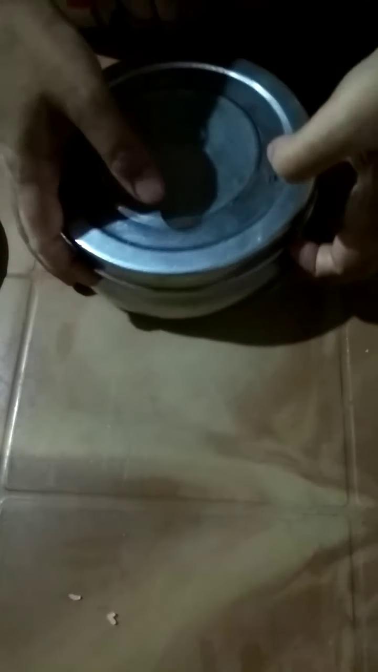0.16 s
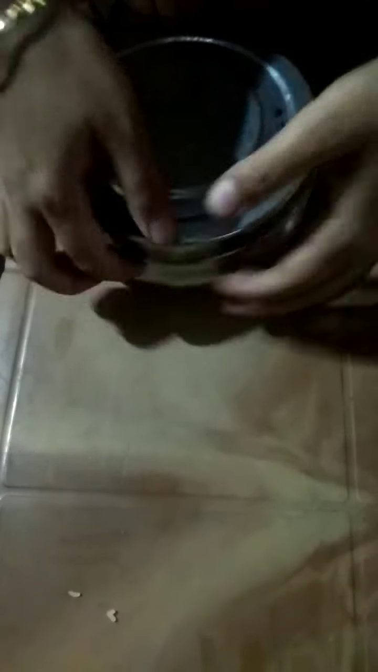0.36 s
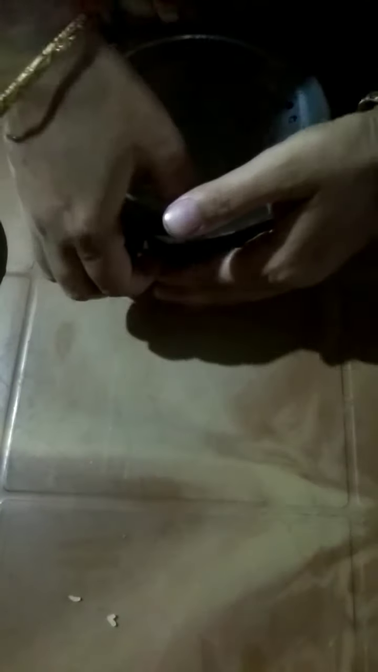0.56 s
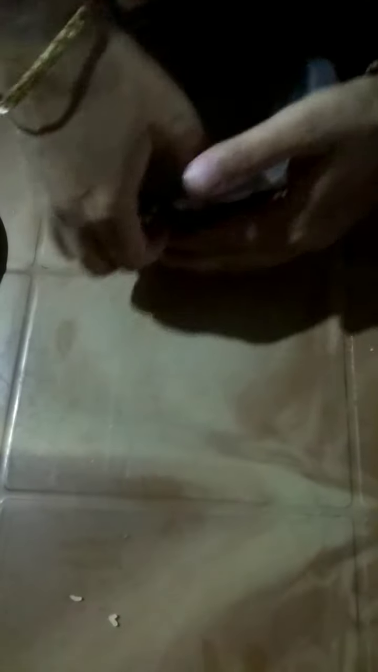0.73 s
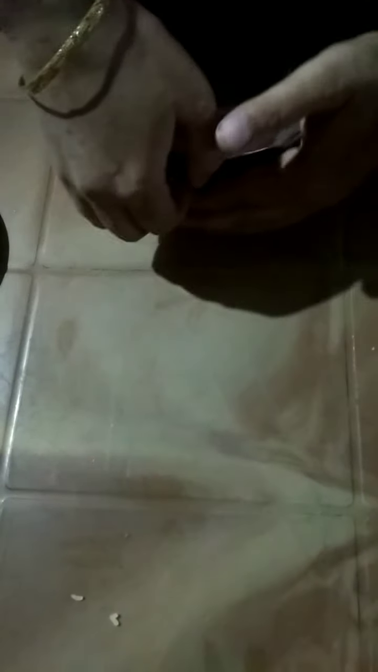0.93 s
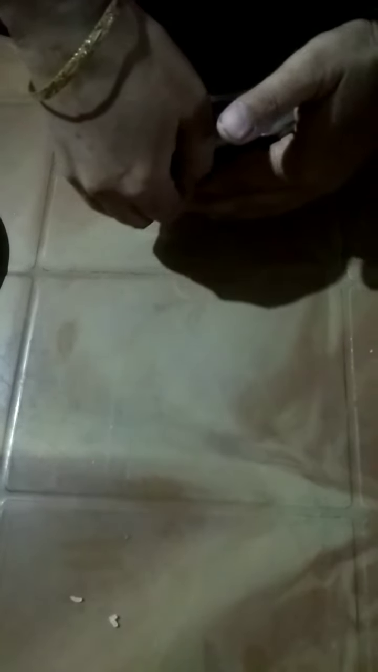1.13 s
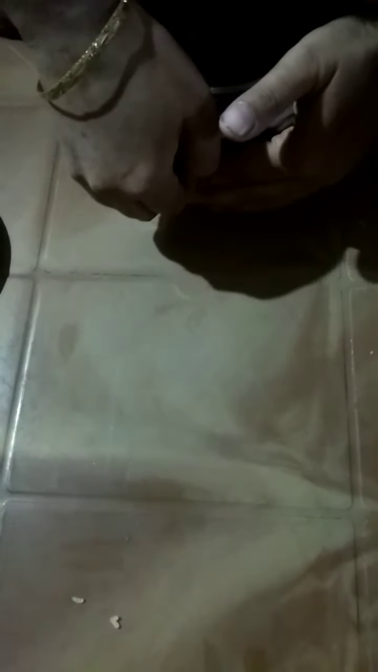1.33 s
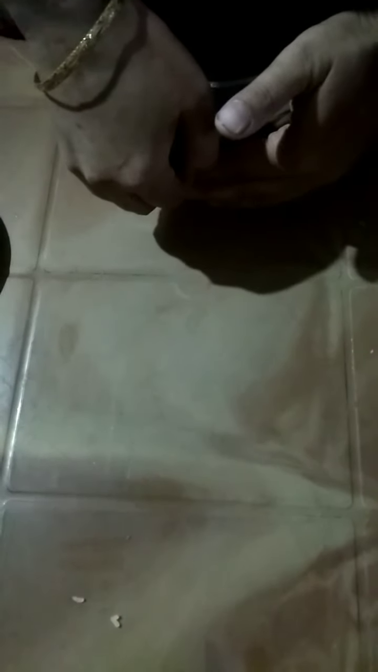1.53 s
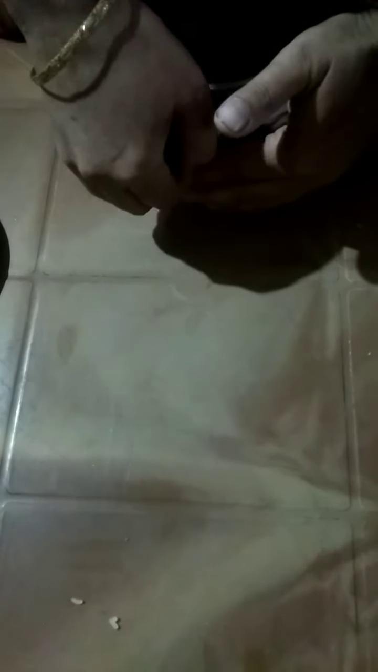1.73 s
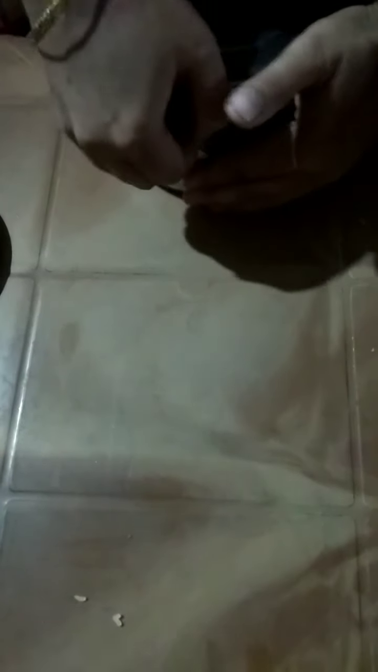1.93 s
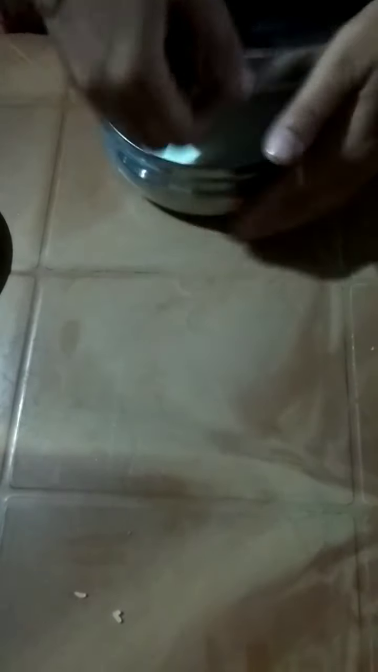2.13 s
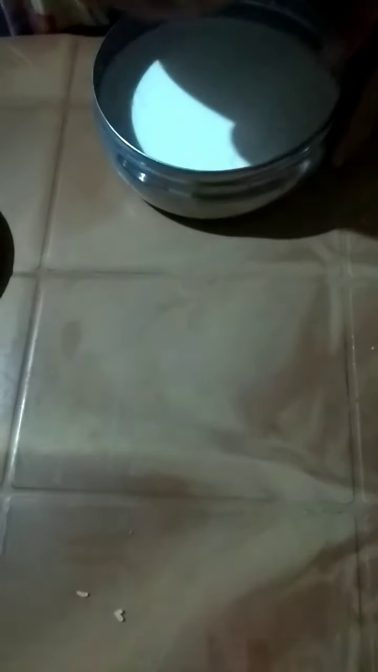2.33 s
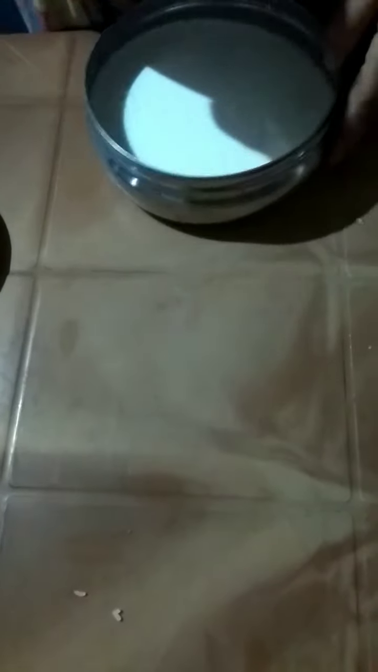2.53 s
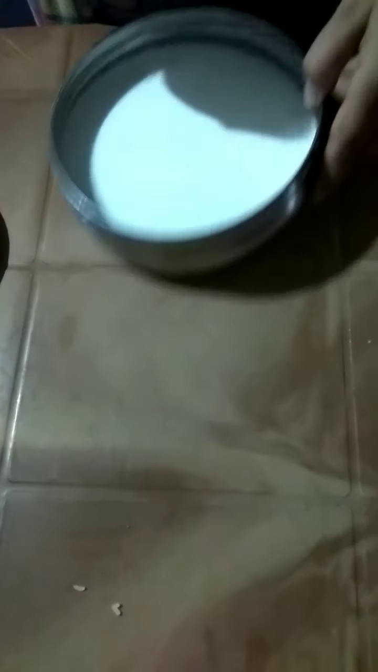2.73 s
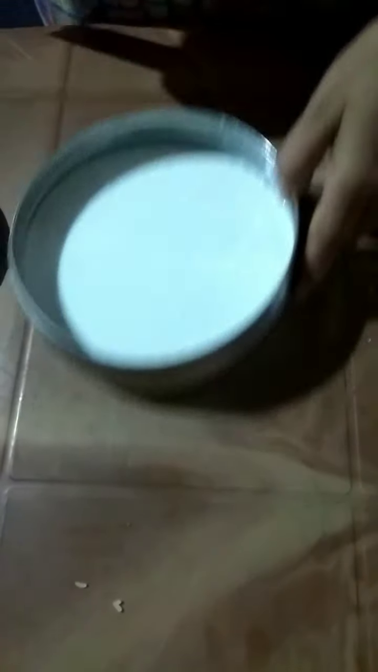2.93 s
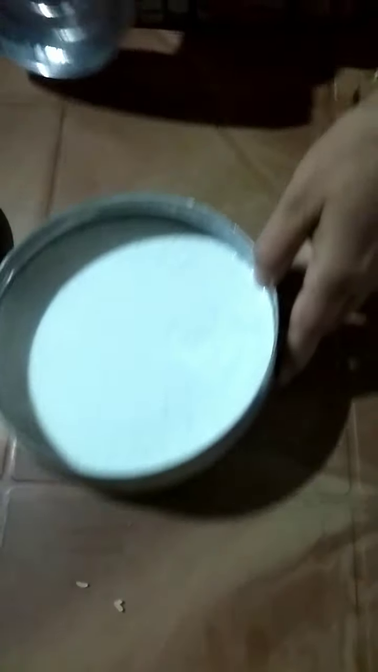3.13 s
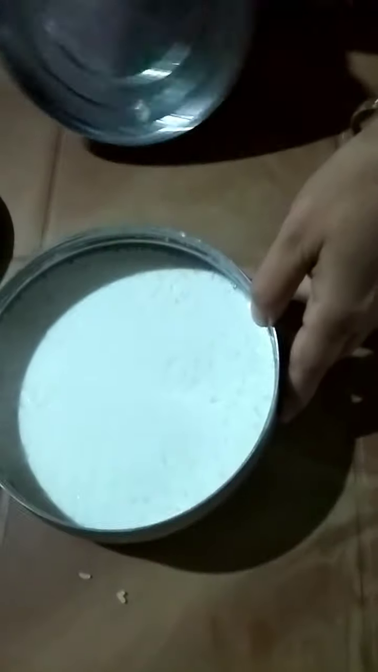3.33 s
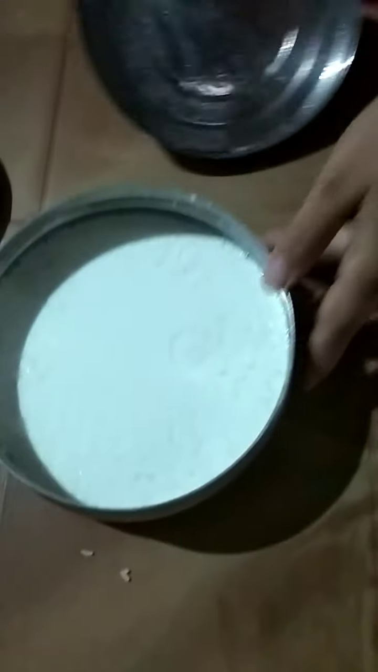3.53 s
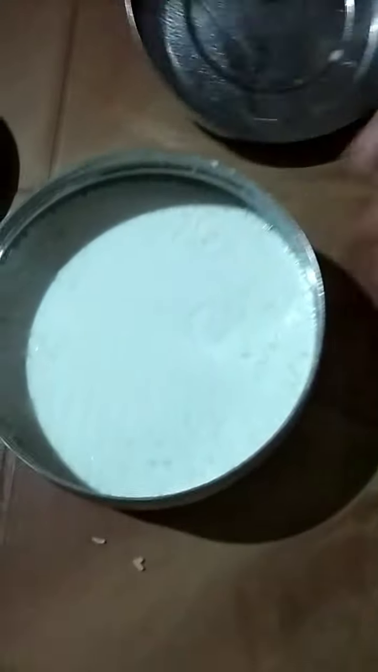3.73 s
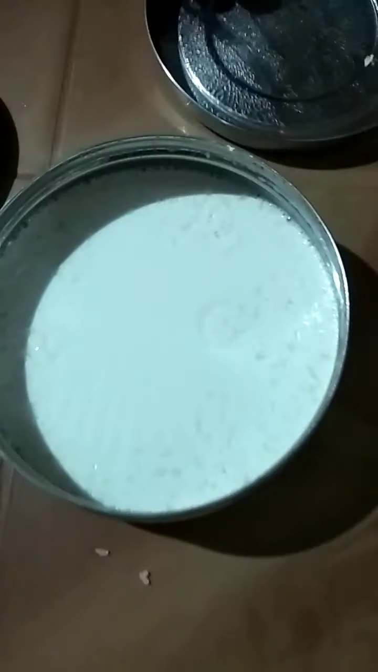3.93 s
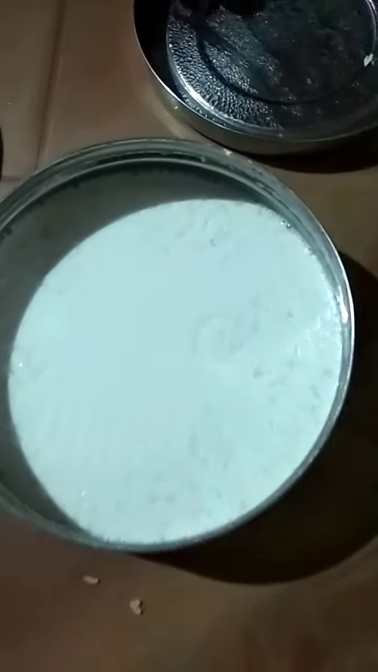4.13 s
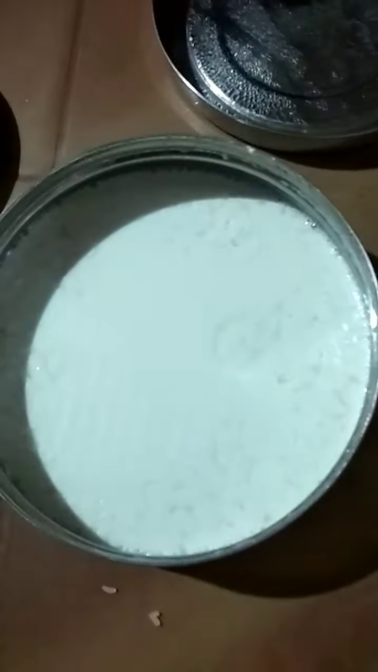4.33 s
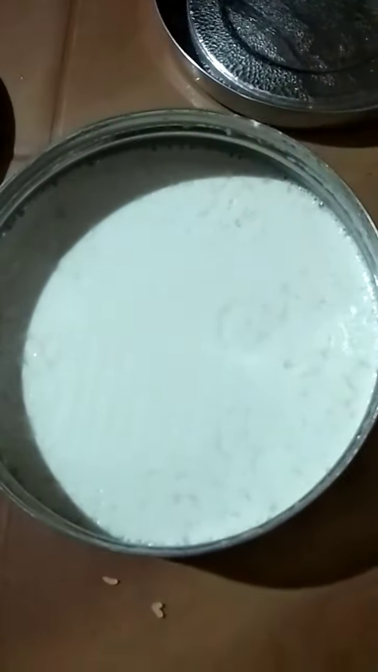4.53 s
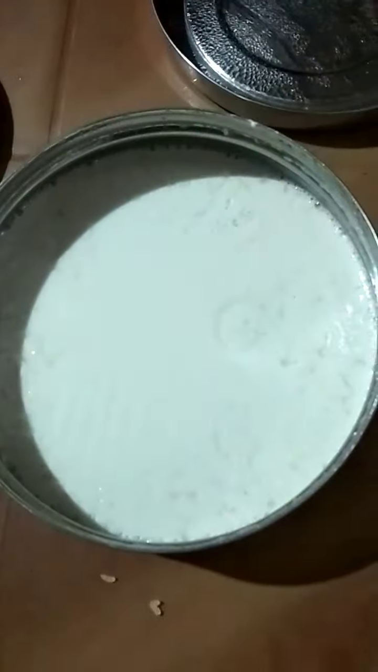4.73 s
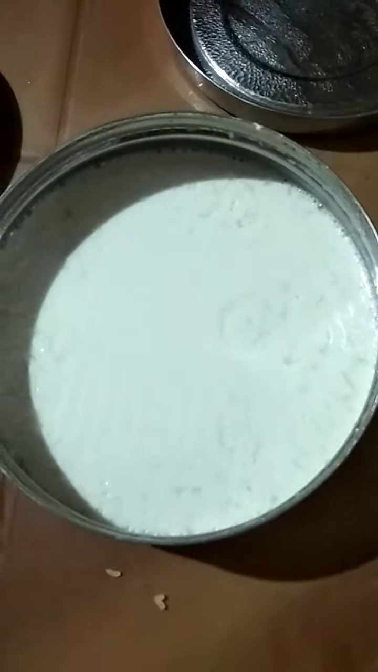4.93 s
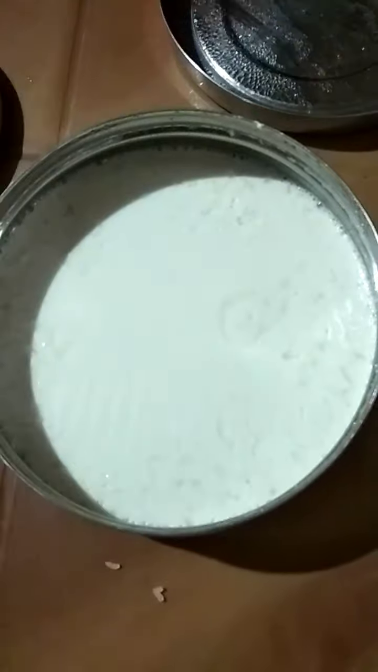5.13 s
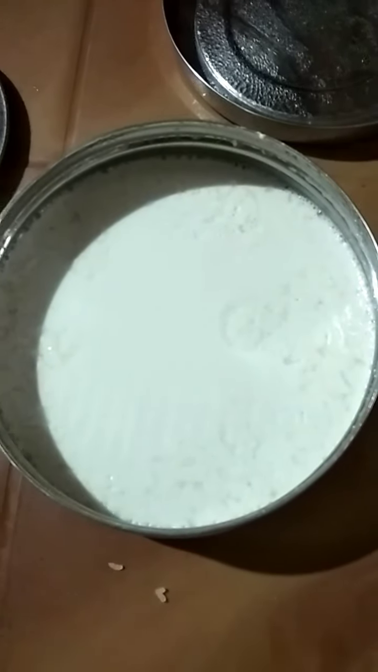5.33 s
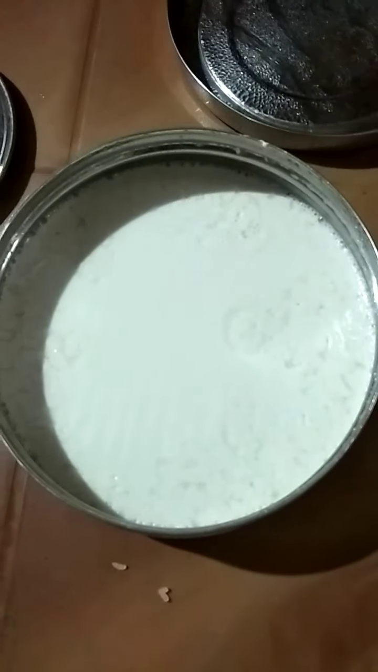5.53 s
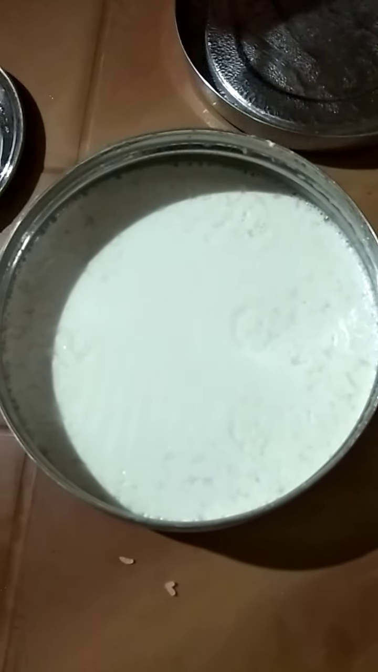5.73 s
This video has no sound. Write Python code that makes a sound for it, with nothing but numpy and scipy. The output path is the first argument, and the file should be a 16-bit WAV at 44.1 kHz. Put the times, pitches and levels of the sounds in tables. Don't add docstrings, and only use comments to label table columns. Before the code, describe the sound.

Fingers scrape and tug a tight steel lid until it springs off with a sharp ringing clank, then it is laid on tile and bangles clink.

```python
import sys
import numpy as np
from scipy import signal
from scipy.fft import rfft, irfft, next_fast_len
from scipy.io import wavfile
from scipy.ndimage import uniform_filter1d, map_coordinates

SR = 44100
rng = np.random.default_rng(int(sys.argv[2]) if len(sys.argv) > 2 else 0)


def master_out(mix):
    frames = np.transpose(np.atleast_2d(mix))
    ceiling = np.clip(frames, -1, 1)
    pcm = np.round(ceiling * 32767).astype(np.int16)
    wavfile.write(sys.argv[1], SR, pcm)


def gain_from_db(level_db):
    decades = np.asarray(level_db, float) / 20
    return 10 ** decades


N = 259562

# frequency in Hz, density in dB per Hz.
HISS_SPECTRUM = [(20, -120), (150, -15.5), (600, -16), (1500, -19), (4400, -10.5), (4900, -6), (7000, 0.5),
                 (8800, -5.5), (10500, 5.5), (11500, -6), (12500, -11.5), (14000, -1.5), (15400, -9.5),
                 (15900, -51)]
# frequency in Hz, density in dB per Hz.
RUMBLE_SPECTRUM = [(9, -25), (18, 9.5), (30, 0.5), (40, -11), (58, -7), (100, -11.5), (150, -24),
                   (204, -10.5), (400, -32.5), (880, -120)]
# peak in seconds, level in dB.
PHONE_JOLTS = [
    (.18, -42.5),
    (1.26, -58),
    (1.93, -39),
    (1.965, -55),
    (2.25, -42),
    (2.6, -42),
    (2.92, -45.5),
    (3.07, -42),
    (3.53, -47),
    (4.72, -56),
]
# frequency in Hz, likeness from 0 to 1.
PORT_LIKENESS = [(20, .96), (60, .985), (150, .995), (300, .96), (640, .25), (1400, .05), (15000, .02)]
# peak, rise and fall in seconds, rim scrape in dB, skin rub in dB.
FINGER_STROKES = [(.17, 0.02, 0.21, -54.5, -58), (.34, 0.26, 0.17, -57.5, -52), (.68, 0.16, 0.2, -56, -82),
                  (.8, 0.12, 0.21, -55.5, -49), (.93, 0.072, 0.054, -54.5, -53),
                  (1.17, 0.13, 0.039, -55, -51), (1.3, 0.3, 0.55, -60.5, -59),
                  (1.59, 0.045, 0.016, -56.5, -57), (1.69, 0.03, 0.3, -59.5, -54),
                  (1.93, 0.081, 0.045, -45, -49), (2.07, 0.33, 0.11, -58, -55.5),
                  (2.181, 0.028, 0.15, -46, -44.5), (2.61, 0.076, 0.0079, -56, -55),
                  (2.67, 0.067, 0.2, -57, -46), (2.86, 0.12, 0.16, -50.5, -50),
                  (3.034, 0.09, 0.32, -50, -47), (3.08, 0.16, 0.88, -60.5, -51.5),
                  (4.108, 0.033, 0.066, -62, -53.5), (4.45, 0.48, 0.38, -91, -52),
                  (4.801, 0.2, 0.64, -67.5, -49.5), (5.18, 0.029, 0.16, -81, -72),
                  (5.411, 0.24, 0.1, -66.5, -57), (5.72, 0.25, 0.78, -69.5, -54)]
# peak, rise and fall in seconds, level in dB.
BOWL_SLIDES = [(.26, 0.095, 0.31, -46), (.75, 0.28, 0.27, -49.5), (1.62, 0.21, 0.036, -43),
               (1.87, 0.11, 0.11, -37), (2.05, 0.22, 0.49, -43), (2.62, 0.093, 0.22, -47),
               (2.88, 0.084, 0.12, -33.5), (3.079, 0.11, 0.23, -42), (3.3, 0.1, 0.14, -42),
               (3.749, 0.19, 0.17, -46), (4.0, 0.17, 0.84, -53.5), (4.95, 0.18, 0.11, -52)]
# frequency in Hz, density in dB per Hz.
SCRAPE_SPECTRUM = [(210, -17), (350, -4.5), (729, -5), (1100, -11.5), (3580, -12), (5000, -10), (6500, -34),
                   (11000, -120)]
# frequency in Hz, density in dB per Hz.
SKIN_SPECTRUM = [(2350, -78), (4000, -18), (5260, -4), (7090, -3.5), (8610, -4.5), (9880, -2.5), (12100, 0),
                 (15700, -11)]

# start in seconds, peak in dB, push in Hz, ring in dB.
BOWL_KNOCKS = [(0.631, -39, 333, -12.5), (1.462, -29, 147, -15), (1.527, -33.5, 135, -12),
               (1.779, -30.5, 129, -10.5), (2.18, -21, 316, -19), (2.197, -26, 127, -11.5),
               (2.538, -46, 295, -7), (2.552, -43, 285, -9), (2.569, -39, 303, -12), (2.602, -45, 358, -5),
               (2.61, -36.5, 317, -9.5), (2.617, -57, 144, -16), (2.813, -40, 133, -23),
               (2.837, -53, 161, -15), (2.8677, -32.5, 126, -8), (2.887, -42, 293, -13),
               (2.9038, -34, 154, -19), (3.145, -42, 290, -7), (3.205, -41.5, 120, -24),
               (3.079, -38, 154, -21), (3.185, -34.5, 107, -33), (3.248, -39, 112, -19.5),
               (3.5098, -20.5, 306, -17), (4.081, -52, 200, -13), (4.091, -44, 200, -12),
               (4.068, -43.5, 204, -18), (4.101, -32.5, 327, -11.5), (4.112, -34.5, 295, -7),
               (4.907, -42, 280, -7)]
# start in seconds, peak in dB, push in Hz,
# seconds to the second landing, its loss in dB.
BASE_ROCKS = [
    (.151, -21.5, 149, 0.027, 11),
    (1.573, -27, 149, 0.028, 13),
    (1.677, -25, 148, .032, 15),
    (3.032, -29.5, 108, 0.021, 8),
    (3.292, -36, 122, 0.023, 0.5),
]
# start in seconds, peak in dB, push in Hz,
# seconds between knocks, count of knocks, ring in dB.
BASE_JUDDERS = [
    (2.2, -34.5, 142, 0.015, 4, -16),
    (2.93, -39.5, 120, .024, 3, -16),
    (1.9027, -36.5, 170, .0063, 4, -30),
    (1.9285, -43.5, 325, .0031, 4, -32),
    (.18, -37, 160, .0063, 3, -28),
    (.2215, -43, 155, .0066, 3, -28),
    (1.855, -41.5, 277, .012, 4, -32),
]
# frequency in Hz, level in dB, T60 in seconds, left-right in dB.
FULL_BOWL_MODES = [(142.2, -0.5, 0.36, 0.5), (168, -8, 0.36, 0), (298, -5, 0.13, 1.5),
                   (325.2, 3, 0.12, 0.5), (490, -8, 0.069, -3), (682, -17.5, 0.057, -1)]
# start in seconds, peak, ring, left-right and wash in dB.
HEEL_DROPS = [
    (.158, -54, 20, 0, -14),
    (1.955, -58, 21, 0, -14),
    (3.0462, -50.5, 21.3, 0, -4),
    (3.08, -58, 12, 0, -14),
]
# frequency in Hz, level in dB, T60 in seconds, left-right in dB.
SLAB_MODES = [(68, 0, 0.087, 0)]
# start in seconds, peak, ring, left-right and wash in dB.
LID_CHATTER = [
    (.184, -44.5, -5.5, 0, -13),
    (.1994, -38, -7.5, 0, -14),
    (.211, -43, -3, 0, -8),
    (3.0324, -36, -5, 0.95, -6),
    (3.088, -60.5, 10, 0.13, 15),
]
# frequency in Hz, level in dB, T60 in seconds, left-right in dB.
LOOSE_LID_MODES = [(845, -10, 0.028, 0), (1085, 8.5, 0.019, 0), (1223, -8, 0.093, 0), (2280, 4, 0.026, 0)]

# start in seconds, peak, ring, left-right and wash in dB.
LID_POP = [
    (2.1818, -34, -49.5, 0, -32),
    (2.189, -5.5, -21.5, -3, -14),
    (2.2044, -23.5, -10.5, 1, -5.5),
]
# frequency in Hz, level in dB, T60 in seconds, left-right in dB.
LID_MODES = [(754, -4, 0.28, 1), (970, -14, .35, 0), (1021, 0, 0.55, 1), (1252, -10.5, 0.53, 5),
             (1549, -6.5, 0.6, -9.5), (1783, -13, 0.39, -4), (2094, -24, 0.5, -1), (2261, -9, .22, 2),
             (2573, -13, 0.6, -1), (2783, -17, .5, 4), (2912, -20, 0.72, -12), (3133, -17, .6, 3),
             (3432, -11, 0.35, 5), (3817, -14, .3, -6)]
# start in seconds, peak, ring, left-right and wash in dB.
LIP_SLIP = [
    (2.1856, -4.5, -21.5, 0, -15),
]
# frequency in Hz, level in dB, T60 in seconds, left-right in dB.
LIP_MODES = [(3490, 12, .042, -6), (3830, 12, .045, -8), (8594, -7, .17, 0), (8808, -12, .25, -6),
             (9504, -10, .25, -11), (10335, -14, .4, 0), (12573, -14, .3, -2)]
# start in seconds, peak, ring, left-right and wash in dB.
CROWN_FLEX = [
    (2.19, -19.5, -5.5, -5, -24),
    (2.232, -34, -1.5, -10, -11.5),
]
# frequency in Hz, level in dB, T60 in seconds, left-right in dB.
CROWN_MODES = [(4619, -14.5, 0.53, -1), (4920, -8, 0.226, -6.5), (5803, -18, 0.465, 10),
               (6158, -2, 0.16, -6.5), (6650, -6, .15, 5), (7160, -17, 0.35, -6), (7540, -5.5, 0.11, -5),
               (8000, -24, .35, 1), (8000, -11, 0.22, 5), (11100, -11, 0.27, -2), (11800, -10, .15, 0),
               (11760, -16.5, 0.29, -8), (13380, -9.5, .14, -4), (14100, -16, .2, 0.5)]
# start in seconds, peak, ring, left-right and wash in dB.
LID_REBOUND = [
    (2.3715, -21, -21, -1.5, -20),
    (2.3765, -26, -26, 0, -22.5),
    (2.398, -49, -2, 0, -8),
]
# frequency in Hz, level in dB, T60 in seconds, left-right in dB.
EDGE_MODES = [(1970, -2, 0.026, 8), (2390, 4.5, 0.057, 5), (2620, 4, 0.051, -11), (3090, 1, 0.049, 20),
              (4700, 6, 0.026, -3)]
# start in seconds, peak, ring, left-right and wash in dB.
WALL_SCUFFS = [
    (2.551, -50.5, -2, 0, 3),
    (2.607, -41, 1, 0, -7),
    (2.815, -51, -3, 0, -2),
    (2.845, -50, 0.5, 0, -11),
    (2.872, -48, 3, 0, -11),
    (2.889, -47, 2, 0.0052, -14),
    (2.912, -47, -1, 0.0069, -11),
    (3.255, -46, -7.5, 0, -6),
]
# frequency in Hz, level in dB, T60 in seconds, left-right in dB.
WALL_MODES = [(422, 1.5, 0.095, 0.0042), (555, -1, 0.15, 0), (760, -2, 0.068, 0), (1250, -4, 0.062, 0)]
# start in seconds, peak, ring, left-right and wash in dB.
RIM_STRIKES = [
    (2.6283, -15.5, -23.5, -2.3, -30),
    (2.648, -33, -9, 1, -9),
    (2.697, -48.5, -7, -1, 3),
]
# frequency in Hz, level in dB, T60 in seconds, left-right in dB.
BOWL_MODES = [(1007, -2.5, 0.18, -2), (1958, -6.5, 0.4, 0), (3240, -6, .1, 3), (3600, -17, .4, 4),
              (3860, -1, 0.082, 0), (4120, -5, .07, -2), (4900, -14.5, 0.32, -5), (5900, -23, .4, 2),
              (6170, -7, .08, 0), (7700, -25, .5, 0)]

# start in seconds, peak, ring, left-right and wash in dB.
LID_DOWN = [
    (3.5145, -18, -21.5, -1.4, -14.5),
    (3.546, -32, -10.5, 1.5, -19),
]
# frequency in Hz, level in dB, T60 in seconds, left-right in dB.
LYING_LID_MODES = [(543, 0, 0.14, -3), (637, -18, 0.27, 1), (848, -9, 0.33, 12), (993, 1, 0.19, 11),
                   (1086, 1.5, .07, 0), (1430, -9.5, 0.53, -13), (1491, -15, 0.29, 2), (1760, -14, .3, 6),
                   (2344, -13.5, 0.7, 9), (2573, -18, .1, -12), (2860, -13, 0.94, -5.5),
                   (2990, -15, 0.3, 1), (3390, -16, .22, 1), (3740, -14, .17, 2)]
# start in seconds, peak, ring, left-right and wash in dB.
FLOOR_BOOMS = [
    (3.5172, -44.5, 16.7, 0, -14),
]
# frequency in Hz, level in dB, T60 in seconds, left-right in dB.
TILE_MODES = [(140.9, 1, 0.32, -1), (258, -6.5, 0.19, 0)]
# start in seconds, peak, ring, left-right and wash in dB.
LID_SETTLING = [
    (3.577, -49, 12.7, 0, -15),
    (3.642, -44, 8.6, 0, -5),
    (3.688, -60, 8, 0, -5),
    (3.716, -52, 10, 0.0057, -10),
    (3.787, -58, 11.7, 0.012, -16),
    (3.83, -69, 8.9, 0, -4),
    (3.885, -62.5, 11, 0, -4),
]
# frequency in Hz, level in dB, T60 in seconds, left-right in dB.
DISH_MODES = [(282, -1, 0.21, -1.1), (299.5, -7.5, 0.47, -1), (610, -12, 0.054, 0), (845, -23, 0.062, 0)]
# start in seconds, peak, ring, left-right and wash in dB.
LID_NUDGES = [
    (4.092, -52, -4, 0.13, -3),
    (4.104, -38, -7.5, -1.7, -7),
]
# frequency in Hz, level in dB, T60 in seconds, left-right in dB.
NUDGED_MODES = [(580, -5.5, 0.15, 0), (707, 1.5, 0.15, 0), (1050, -3, 0.054, 0), (1580, -12, 0.13, 0),
                (2250, -6, .1, 0)]
# start in seconds, peak, ring, left-right and wash in dB.
CLINK_ONE = [
    (4.8188, -33, -1, 4, -4),
]
# frequency in Hz, level in dB, T60 in seconds, left-right in dB.
BANGLE_ONE_MODES = [(898, -8, .04, 0), (2414, -9, .75, 3), (3041, -12, .07, -6), (3500, -14, .04, 0),
                    (10461, -10, .16, -3), (11623, -8, .35, 8), (11793, -2, .15, 20)]
# start in seconds, peak, ring, left-right and wash in dB.
CLINK_TWO = [
    (4.9121, -21, -12, 1, -11),
]
# frequency in Hz, level in dB, T60 in seconds, left-right in dB.
BANGLE_TWO_MODES = [(2602.3, -3, .6, 1), (2610.3, -3.5, .6, 1), (4651, -6, .38, -7), (5915, 0, .22, -4),
                    (5975, -2, .17, 3), (6839, -5, .22, -4), (6900, -9, .15, 2), (8127, -4, .2, 2),
                    (8190, -8, .14, -3), (9796, -14, .35, -9), (11183, -2, .3, -8), (11625, -2, .25, 2),
                    (11793, -4, .17, 5), (12085, 0, .15, 4)]

# frequency in Hz, density in dB per Hz.
SNAP_SPECTRUM = [(180, -34), (330, -12), (560, -13), (2400, -24), (3030, -28), (3530, -8.5), (5460, -16),
                 (6030, -17), (11800, -11), (15700, -20), (16500, -41.5)]
# frequency in Hz, density in dB per Hz.
TAP_SPECTRUM = [(240, -2.5), (400, -9.5), (1080, -6.5), (1550, -23.5), (4800, -18), (7090, -45),
                (11500, -30), (15600, -77)]
# frequency in Hz, density in dB per Hz.
TICK_SPECTRUM = [(180, -40.5), (300, -7.5), (2600, -17), (5180, -23), (5800, -17.5), (11400, -0.5),
                 (14000, -7.5), (16000, -40)]
# frequency in Hz, density in dB per Hz.
LID_WASH_SPECTRUM = [(180, -38), (300, -18.5), (946, -12.5), (1510, -17.5), (2210, -10), (10700, -26.5),
                     (15500, -26), (16000, -63)]
# frequency in Hz, density in dB per Hz.
TILE_WASH_SPECTRUM = [(240, -33), (400, -16.5), (640, -7), (1470, -16), (2900, -14), (3300, -19),
                      (9000, -19), (12000, -47)]
# frequency in Hz, T60 in seconds.
KITCHEN_T60 = [(150, 0.18), (1000, 0.67), (4000, 0.58), (12000, 0.2)]


def unit(x):
    return x / np.sqrt(np.mean(x ** 2) + 1e-20)


def along(points, hz):
    f, value = np.transpose(points)
    return np.interp(np.log(hz + 1), np.log(f + 1), value)


def wobble(rate):
    knots = rng.standard_normal(int(N * rate / SR) + 4)
    return map_coordinates(knots, [np.arange(N) * rate / SR])


def add(track, s, sound):
    place = track[:, round(s * SR):][:, :sound.shape[1]]
    place += sound[:, :place.shape[1]]


def swells(peak_s, rise_s, fall_s, db, rest_db):
    peak_s, rise_s, fall_s, db = [np.reshape(v, (-1, 1)) for v in (peak_s, rise_s, fall_s, db)]
    step_s = .002
    late = np.arange(0, N / SR + .01, step_s) - peak_s
    u = late / np.clip(np.where(late < 0, rise_s, fall_s), .005, 1)
    power = np.sum(gain_from_db(db - 10 * u ** 2) ** 2, axis=0) + gain_from_db(rest_db) ** 2
    return np.interp(np.arange(N) / SR, np.arange(len(power)) * step_s, np.sqrt(power))


def stereo(pair, spectrum):
    count = pair.shape[1]
    m = next_fast_len(count + 8192)
    hz = np.fft.rfftfreq(m, 1 / SR)
    turn = np.arccos(np.clip(along(PORT_LIKENESS, hz), -1, 1)) / 2
    coloured = rfft(pair, m) * gain_from_db(along(spectrum, hz))
    mid, side = irfft(coloured * [np.cos(turn), np.sin(turn)], m)[:, :count]
    return unit(np.array([mid + side, mid - side]))


def gritty(rate, rough_db):
    return rng.standard_normal((2, N)) * gain_from_db(rough_db * wobble(rate))


def patchy(depth_db):
    z = signal.stft(rng.standard_normal((2, N)), nperseg=512)[2]
    field = uniform_filter1d(rng.standard_normal(z.shape[1:]), size=4, axis=0)
    field = uniform_filter1d(field, size=12, axis=1)
    return signal.istft(z * gain_from_db(depth_db * unit(field)), nperseg=512)[1][:, :N]


def crowd(count, share):
    z = rfft(rng.standard_normal((2, count)))
    sounding = rng.random(z.shape[1]) < share
    floor = min(.12, .55 * np.sqrt(share))
    return irfft(z * (sounding + floor), count)


def ring(modes, t, spread, flutter=0):
    hz, db, t60, pan_db = np.transpose(modes)[:, :, None]
    port = np.array([.5, -.5])[:, None, None]
    apart = spread * port * np.arccos(np.clip(along(PORT_LIKENESS, hz), -1, 1))
    beat_hz = rng.uniform(6, 18, hz.shape)
    start = rng.uniform(0, 2 * np.pi, (2, *hz.shape))
    beat = 1 + flutter * np.sin(2 * np.pi * beat_hz * t + start)
    size = gain_from_db(db + port * pan_db - 60 * t / np.clip(t60, .01, 2)) * beat
    waver = 0
    if flutter:
        walks = np.cumsum(rng.standard_normal((len(hz), 30)), axis=1)
        waver = 1.1 * flutter * np.array([np.interp(t, np.arange(30) / 58, walk - walk[0]) for walk in walks])
    tones = size * np.sin(2 * np.pi * hz * t + apart + waver)
    return np.sum(tones, axis=1) * (1 - np.exp(-t / 0.00057))


def struck(contacts, modes, crack_colour, wash_colour, crack_t60, wash_t60, grip_t60,
           flutter=.4, share=.024, size=SR // 2):
    out, t = np.zeros((2, N)), np.arange(size) / SR
    for s, db, ring_db, pan_db, wash_db in contacts:
        crack = stereo(rng.standard_normal((2, len(t))), crack_colour) * gain_from_db(-60 * t / crack_t60)
        wash = stereo(crowd(len(t), share), wash_colour) * gain_from_db(wash_db - 60 * t / wash_t60)
        wash *= gain_from_db(2.5 * np.interp(t, np.arange(60) / 110, rng.standard_normal(60)))
        pan = gain_from_db(pan_db * np.array([[.5], [-.5]]) - 6.0)
        noise = pan * (crack + wash) * (1 - np.exp(-t / 0.00091))
        grip = gain_from_db(ring_db - 60 * (t / grip_t60) ** 4)
        add(out, s, gain_from_db(db) * (noise + grip * ring(modes, t, spread=0.98, flutter=flutter)))
    return out


def background():
    hiss = gain_from_db(-52.5 + 4.5) * stereo(patchy(depth_db=2.0), HISS_SPECTRUM)
    sway = stereo(gritty(rate=9, rough_db=1.5), RUMBLE_SPECTRUM)
    s, db = np.transpose(PHONE_JOLTS)
    jolts = swells(s, rise_s=0.032, fall_s=0.059, db=db, rest_db=-57)
    return hiss + jolts * gain_from_db(4.5 * wobble(3.374)) * sway


def bowl_response(t, push_hz, ring_db):
    push = -np.sin(2 * np.pi * push_hz * t) * (t / 0.0032) * np.exp(1 - t / 0.0032)
    return push + gain_from_db(ring_db) * ring(FULL_BOWL_MODES, t, spread=0.48) * (1 - np.exp(-t / 0.0022))


def hands():
    *when, scrape_db, rub_db = np.transpose(FINGER_STROKES)
    t = np.arange(SR // 4) / SR
    slips = rng.standard_normal(N) * gain_from_db(1.5 * wobble(45))
    response = bowl_response(t, push_hz=147.3, ring_db=-12.5)
    drag = unit(signal.fftconvolve(slips[None], response, axes=1)[:, :N])
    drag = gain_from_db(-11.0) * swells(*np.transpose(BOWL_SLIDES), rest_db=-68.5) * drag
    scrape = stereo(gritty(rate=60, rough_db=3.0), SCRAPE_SPECTRUM)
    scrape *= swells(*when, scrape_db + 0.25, rest_db=-82.0)
    rub = stereo(gritty(rate=77, rough_db=2.0), SKIN_SPECTRUM)
    rub *= swells(*when, rub_db + 4.0, rest_db=-60)
    return drag + scrape + rub


def knocks():
    out, t = np.zeros((2, N)), np.arange(SR // 4) / SR
    landings = list(BOWL_KNOCKS)
    for s, db, push_hz, gap_s, loss_db in BASE_ROCKS:
        landings += [(s + k * gap_s, db - k * loss_db, push_hz, -13) for k in (0, 1)]
    for s, db, push_hz, gap_s, count, ring_db in BASE_JUDDERS:
        landings += [(s + k * gap_s, db, push_hz, ring_db) for k in range(round(count))]
    for s, db, push_hz, ring_db in landings:
        tap = stereo(rng.standard_normal((2, 2048)), TAP_SPECTRUM)
        edge = np.resize(tap.T, (len(t), 2)).T * gain_from_db(-21 - 60 * t / 0.032)
        gain = gain_from_db(db + np.array([[-.6], [.6]]))
        add(out, s + 0.00545, gain * (bowl_response(t, push_hz, ring_db) + edge))
    return out


def heel_drops():
    return struck(HEEL_DROPS, SLAB_MODES, TAP_SPECTRUM, TILE_WASH_SPECTRUM,
                  crack_t60=.03, wash_t60=.2, grip_t60=.3, flutter=0, size=SR // 5)


def lid_chatter():
    return struck(LID_CHATTER, LOOSE_LID_MODES, TAP_SPECTRUM, TILE_WASH_SPECTRUM,
                  crack_t60=0.042, wash_t60=0.14, grip_t60=0.4, share=.4, size=SR // 5)


def lid_pop():
    clank = struck(LID_POP, LID_MODES, SNAP_SPECTRUM, LID_WASH_SPECTRUM,
                   crack_t60=0.035, wash_t60=0.48, grip_t60=0.36, flutter=0.66, share=.16)
    lip = struck(LIP_SLIP, LIP_MODES, SNAP_SPECTRUM, TICK_SPECTRUM,
                 crack_t60=0.012, wash_t60=0.41, grip_t60=0.352, share=0.022)
    crown = struck(CROWN_FLEX, CROWN_MODES, SNAP_SPECTRUM, TICK_SPECTRUM,
                   crack_t60=.015, wash_t60=0.26, grip_t60=0.25, flutter=0.93, share=0.012, size=SR // 4)
    return clank + lip + crown


def lid_rebound():
    return struck(LID_REBOUND, EDGE_MODES, TICK_SPECTRUM, LID_WASH_SPECTRUM,
                  crack_t60=0.022, wash_t60=0.57, grip_t60=0.046, share=.02, size=SR // 4)


def wall_scuffs():
    return struck(WALL_SCUFFS, WALL_MODES, TAP_SPECTRUM, TILE_WASH_SPECTRUM,
                  crack_t60=.04, wash_t60=0.25, grip_t60=.4, share=0.28, size=SR // 4)


def rim_strike():
    return struck(RIM_STRIKES, BOWL_MODES, SNAP_SPECTRUM, LID_WASH_SPECTRUM,
                  crack_t60=0.032, wash_t60=1.0, grip_t60=0.3, flutter=0.52, share=0.027)


def lid_laid_down():
    return struck(LID_DOWN, LYING_LID_MODES, TAP_SPECTRUM, TILE_WASH_SPECTRUM,
                  crack_t60=0.05, wash_t60=0.8, grip_t60=0.99, flutter=0.75, share=.4)


def floor_boom():
    return struck(FLOOR_BOOMS, TILE_MODES, TAP_SPECTRUM, TILE_WASH_SPECTRUM,
                  crack_t60=.03, wash_t60=.3, grip_t60=0.55, flutter=.1)


def lid_settling():
    return struck(LID_SETTLING, DISH_MODES, TAP_SPECTRUM, TILE_WASH_SPECTRUM,
                  crack_t60=0.026, wash_t60=0.26, grip_t60=0.34, share=0.23, size=SR // 4)


def lid_nudge():
    return struck(LID_NUDGES, NUDGED_MODES, TAP_SPECTRUM, TILE_WASH_SPECTRUM,
                  crack_t60=0.037, wash_t60=0.39, grip_t60=.4, share=0.2, size=SR // 4)


def bangles():
    first = struck(CLINK_ONE, BANGLE_ONE_MODES, TICK_SPECTRUM, TICK_SPECTRUM,
                   crack_t60=.035, wash_t60=.2, grip_t60=.6, flutter=0)
    second = struck(CLINK_TWO, BANGLE_TWO_MODES, TICK_SPECTRUM, TICK_SPECTRUM,
                    crack_t60=.03, wash_t60=.2, grip_t60=.6, flutter=.1)
    return first + second


def kitchen(x):
    hz, t, z = signal.stft(rng.standard_normal((2, SR // 2)), SR, nperseg=256)
    decay = gain_from_db(-60 * t / along(KITCHEN_T60, hz)[:, None])
    tail = signal.istft(z * decay, SR, nperseg=256)[1]
    tail = tail * np.clip(np.arange(tail.shape[1]) / 400, 0, 1)
    return signal.fftconvolve(x, tail / np.linalg.norm(tail[0]), axes=1)[:, :N]


def lagged(x):
    return np.array([np.roll(x[0], 10), x[1]])


def scene():
    thuds = knocks() + heel_drops() + floor_boom() + lid_settling()
    steel = lid_chatter() + lid_pop() + lid_rebound() + wall_scuffs() + rim_strike()
    steel += lid_laid_down() + lid_nudge()
    glass = bangles()
    wet = kitchen(gain_from_db(-16) * steel + gain_from_db(-13) * thuds + gain_from_db(-22) * glass)
    return steel + glass + wet + lagged(thuds + hands() + background())


def top_cut(x):
    return signal.sosfilt(signal.butter(12, 16960, fs=SR, output="sos"), x)


def record(dry):
    return top_cut(dry)


dry = scene()
out = record(dry)
master_out(out)
```